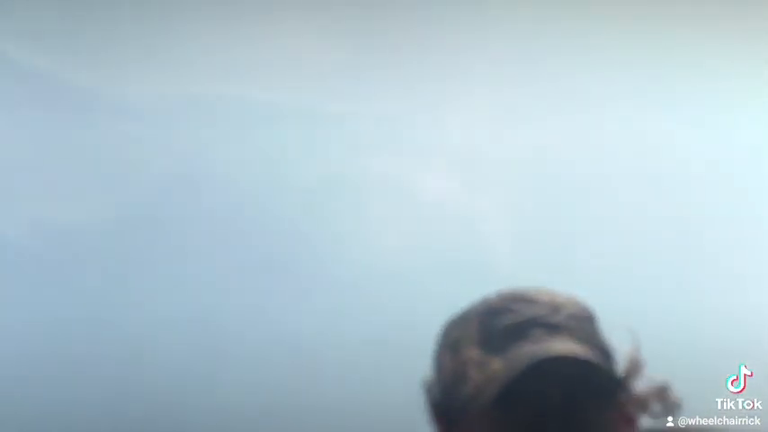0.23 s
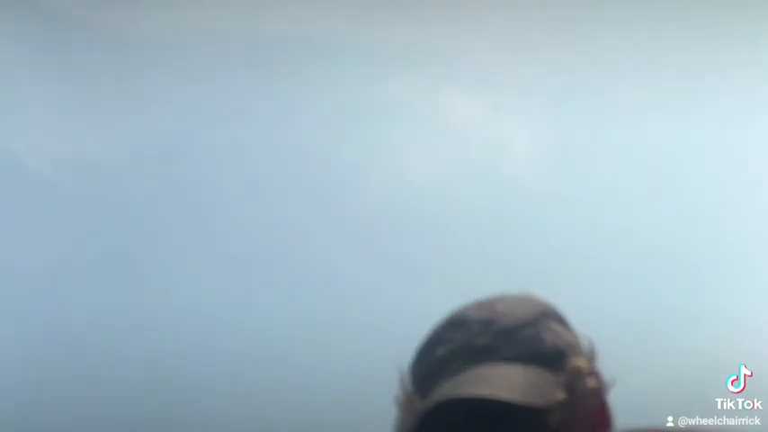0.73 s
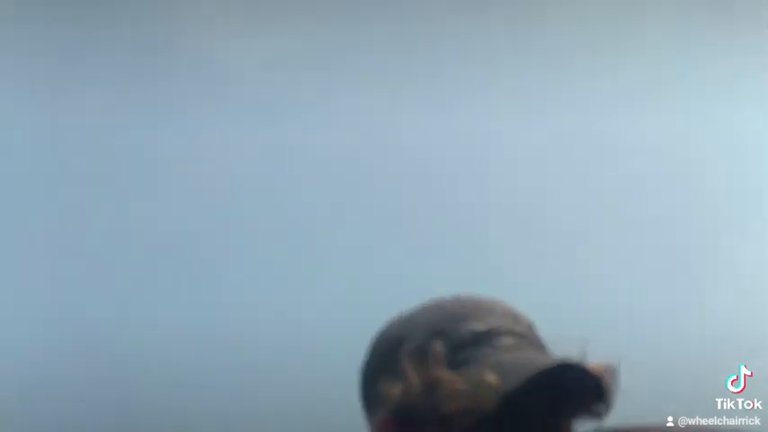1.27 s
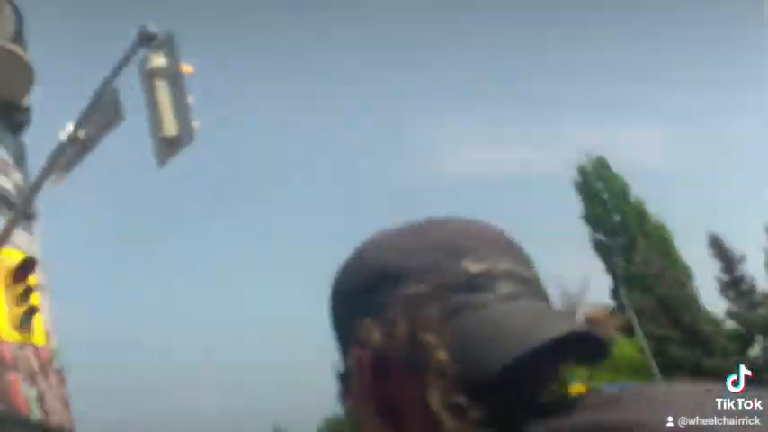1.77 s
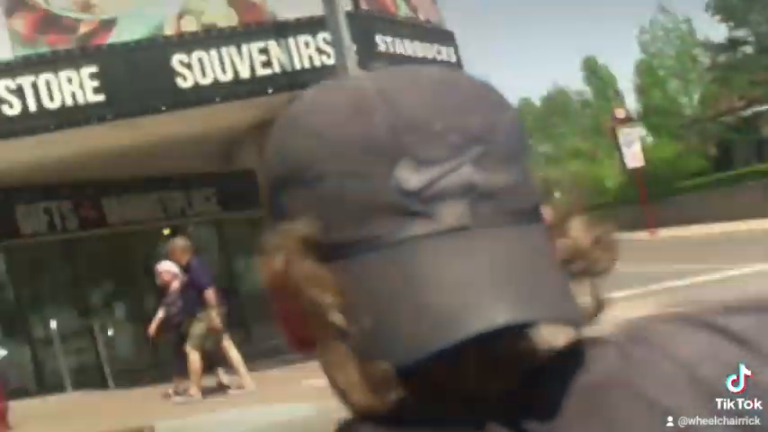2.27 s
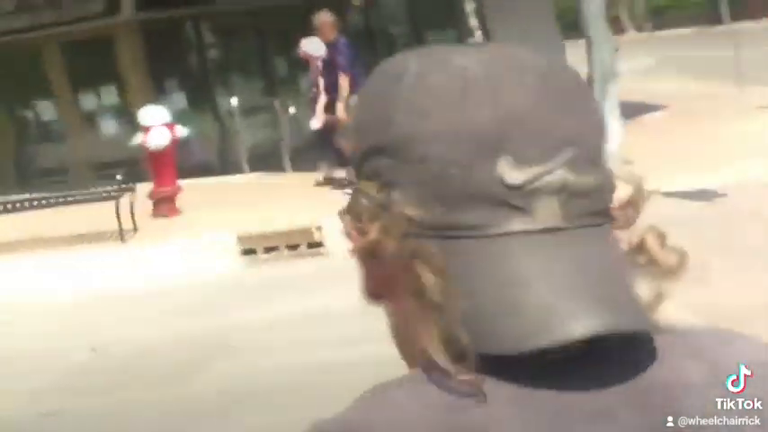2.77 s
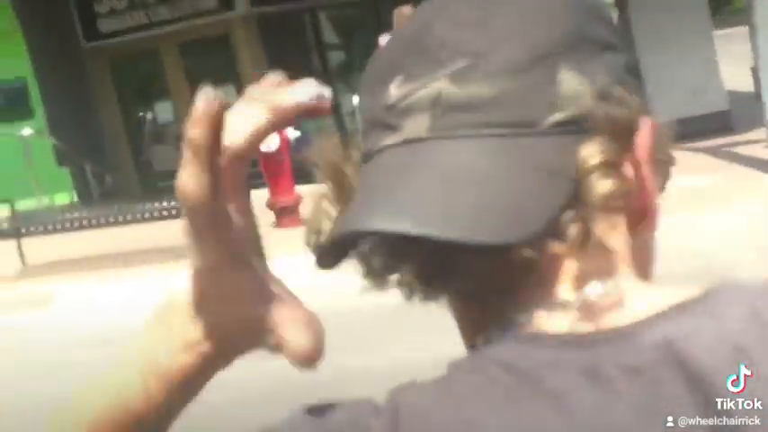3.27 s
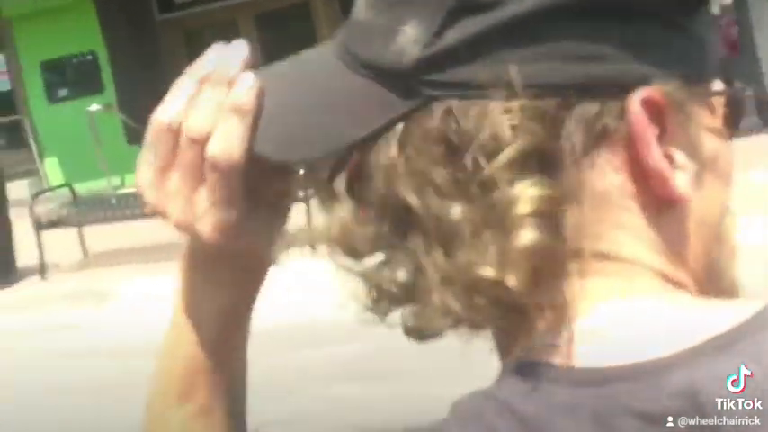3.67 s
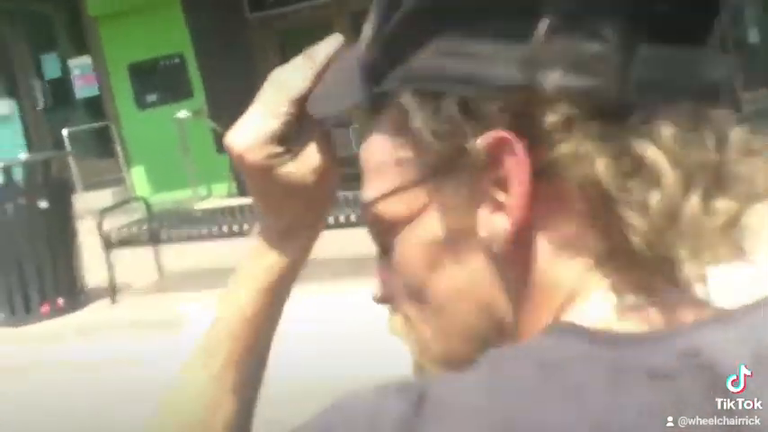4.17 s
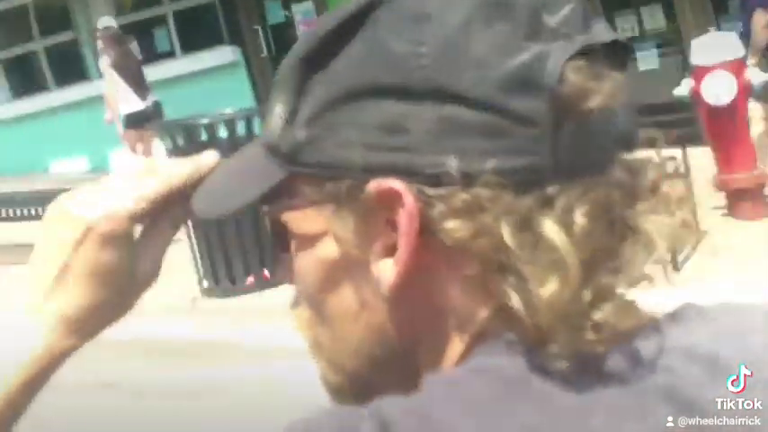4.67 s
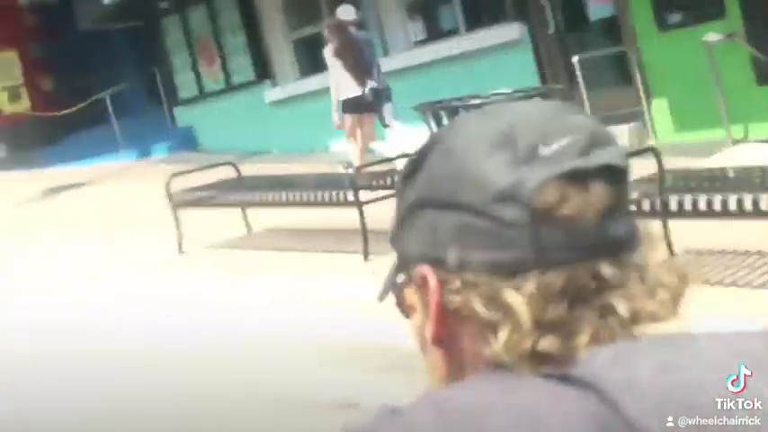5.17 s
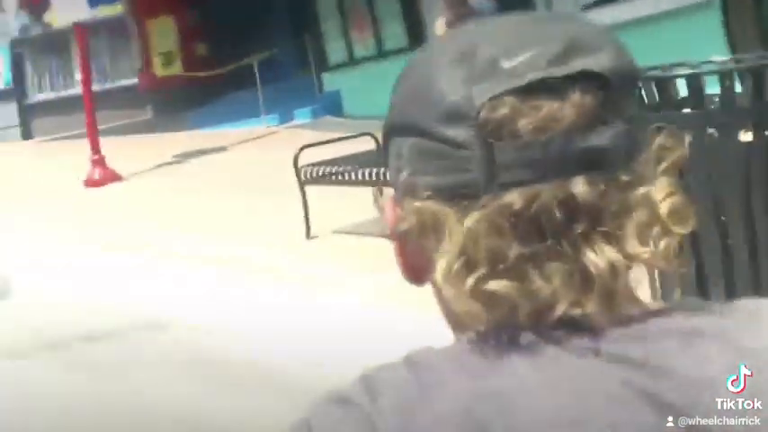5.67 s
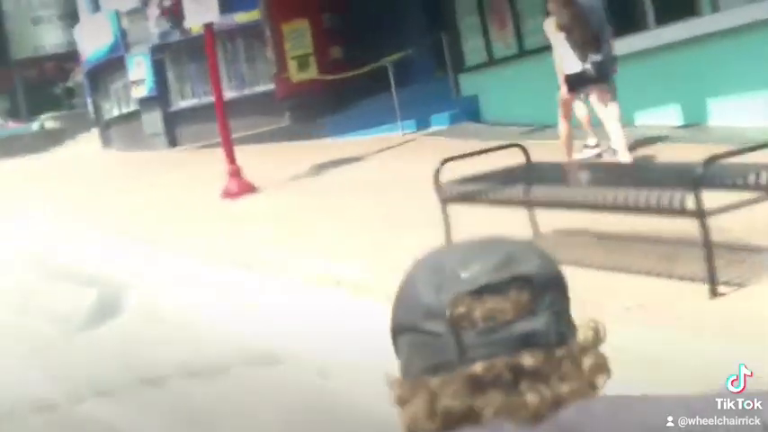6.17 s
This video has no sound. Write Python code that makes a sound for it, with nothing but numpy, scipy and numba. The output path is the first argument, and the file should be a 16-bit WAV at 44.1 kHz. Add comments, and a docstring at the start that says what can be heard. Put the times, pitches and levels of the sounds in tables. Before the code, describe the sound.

Heavy wind buffets the microphone in deep, ragged gusts while a wheelchair rolls over pavement with a gritty hiss that grows louder near the end.

```python
"""A wheelchair rolls downhill on pavement, and a phone rides along in the rumbling wind.
From the start, air flutters and whistles across the microphone's opening, and tyre grit makes the frame
and rims ring; that rolling noise drops at strong gusts and creeps back. A thin squeak comes at 0.6 s,
a bird chirps at 1.8 s, and another squeak follows at 2.4 s. From 2.7 s the wind slaps the microphone,
and near 3 s something small rattles. The slaps end at 5.4 s, and the rolling grows to its loudest."""
import sys
import numpy as np
from scipy import signal
from scipy.fft import rfft, irfft
from scipy.io import wavfile
from scipy.ndimage import uniform_filter1d
from numba import njit

SR = 44100
rng = np.random.default_rng(int(sys.argv[2]) if len(sys.argv) > 2 else 0)


def digitize_waveform(pressure):
    """Quantize a signal to 16-bit integers and store it at the path in sys.argv[1].

    Rows of a 2-D input are taken as channels; values are limited to [-1, 1].
    """
    field = np.atleast_2d(pressure).T
    bounded = np.clip(field, -1, 1)
    quanta = np.round(bounded * 32767).astype(np.int16)
    wavfile.write(sys.argv[1], SR, quanta)


N = 282681
T = np.arange(N) / SR


# Wind rumble: t/s, level/dB, upper bass compared with that level/dB, raggedness/0-1, relative speed
WIND = [(0, -21.5, -5.5, 0.785, .8), (.49, -17, -4, .8, .9), (.75, -18, -5, .8, 1.),
        (.85, -15.5, -17, .8, 1.), (1.17, -14, -14.5, .8, 1.), (1.25, -24, -7, .8, 1.),
        (1.9, -16.5, -4.5, .8, .9), (2.2, -12, -16.5, .8, .9), (2.7, -14.5, -14.5, .6, 1.25),
        (3.2, -16.5, -21, .7, 1.4), (3.55, -14, -24, .9, 1.1), (3.8, -13, -21, .9, .95),
        (4.1, -14, -14.5, .9, .9), (4.35, -14, -17, .9, .9), (4.6, -17.5, -6.5, .9, .9),
        (4.9, -13.5, -28.5, .6, .75), (5.1, -14.5, -15, .8, .8), (5.5, -13.5, -25, .7, .8),
        (5.67, -16.5, -10.5, .3, 1.1), (6.41, -20.5, -4.5, .3, .9)]
# Short dips in the wind rumble's loudness: middle t/s, depth/dB, half length/s
RUMBLE_DIPS = [(0.312, 8.5, 0.029), (0.59, 4.5, 0.085), (0.957, 5, 0.053), (1.263, 2, 0.15),
               (1.77, 5.5, 0.03), (1.947, 12, 0.041), (2.126, 19, 0.015), (2.276, 9.5, 0.034),
               (2.351, 6.5, 0.026), (2.5, 4.5, 0.13), (3.136, 13, 0.0096), (3.299, 16, 0.017),
               (3.37, 6.5, 0.024), (3.511, 17, 0.019), (3.613, 15, 0.0071), (3.717, 14, 0.0075),
               (3.888, 14, 0.014), (3.749, 16, 0.023), (4.112, 5, 0.0174), (4.185, 2.5, 0.011),
               (4.25, 8, 0.03), (4.456, 14, 0.023), (4.68, 4, 0.018), (5.05, 4, 0.0067), (5.297, 14, 0.013),
               (5.565, 10, 0.045)]

def wind_rumble():
    """Big swirls of air drift past at an uneven speed, so slow swings mix with steep edges."""
    level_db, upper_db, raggedness, speed = curves(WIND)
    level_db -= sum(depth * np.exp(-((T - middle) / half) ** 2) for middle, depth, half in RUMBLE_DIPS)
    gusts = raggedness * wobble(35)
    swirls = sum(gain(db) * unit(band(noise(), hz, .75))
                 for hz, db in [(11, .5), (25, 14), (52, 2.5), (92, -8)])
    travelled = np.cumsum(speed * gain(3.5 * gusts))
    deep = np.interp(travelled / travelled[-1] * (N - 1), np.arange(N), low_pass(swirls, 146.7))
    deep = np.tanh(.75 * even_out(deep, .14))  # the microphone's thin skin stiffens on big swings
    flicker_db = 4.7 * gusts + 5.6 * raggedness * wobble(70) + 3.2 * wobble(7.4)
    upper = gain(flicker_db) * low_pass(band(noise(), 151, 1), 370)
    return gain(level_db) * (unit(deep) + gain(upper_db) * even_out(unit(upper), .15))


# Slaps of air on the microphone: t/s, size of the jump/dB, edge time/ms
AIR_SLAPS = [(2.73, -1.5, 0.76), (3.229, -6, 1.0), (3.241, 0.5, 0.67), (3.251, -2.5, 0.43),
             (3.262, -2.5, 1.0), (3.274, -5.5, 0.91), (3.452, 5.5, 1), (3.471, 1, 0.64), (3.565, -11, 0.39),
             (3.573, 0, 0.59), (3.601, -11.5, 0.38), (3.697, 0.5, 0.45), (3.732, -8.5, 0.33),
             (3.738, -4, 0.35), (3.757, -13, 0.29), (3.769, -13, 0.57), (3.814, -18, 0.18),
             (3.85, -3, 0.54), (3.877, 1.5, 0.47), (3.936, -6, 0.29), (3.946, -7.5, 0.38),
             (3.961, -22, 0.34), (3.976, 0.5, 0.4), (4.045, -3, 0.49), (4.093, -11.5, 0.3),
             (4.167, -9.5, 0.24), (4.21, -4, 0.29), (4.24, -7, 0.62), (4.287, -12, .4), (4.312, -0.5, 0.53),
             (4.351, -3.5, 0.21), (4.398, -9.5, 0.11), (4.415, -0.5, 1), (4.522, -3.5, 0.82),
             (4.588, -2, 0.59), (4.624, 3.5, 0.76), (4.789, -5, 0.95), (4.971, -1.5, 0.68),
             (5.003, -2, 0.8), (5.138, -9.5, 0.9), (5.227, -6, 1), (5.256, -3, 0.52), (5.388, -7.5, 0.79)]

def wind_slaps():
    """Air pressure builds, flips through zero in about a millisecond and settles back."""
    build_s, settle_s = .0073, .0043
    out, t = np.zeros(N), np.arange(-2000, 2000) / SR
    swell = np.exp(-np.abs(t) / np.where(t < 0, build_s, settle_s)) / 2
    for middle, db, edge_ms in AIR_SLAPS:
        add(out, middle + t[0], -gain(db) * swell * np.tanh(t * 1000 / edge_ms))
    return out


# Puffs of air: t/s, length/s, level/dB, whistle f/Hz, flutter compared with the whistle/dB
AIR_PUFFS = [(0, 0.037, -14, 1036, 7), (0.037, 0.089, -19.5, 1000, -0.5), (0.133, 0.069, -19.5, 910, 2),
             (0.226, 0.035, -23, 717, 9), (0.303, 0.022, -22, 780, -6), (0.353, 0.033, -21, 490, -1.5),
             (0.411, 0.037, -22, 610, -1.5), (0.458, 0.021, -14, 746, -3), (0.485, 0.087, -21, 615, 4.5),
             (0.59, 0.057, -24.5, 543, 5.5), (0.655, 0.016, -20, 570, 11), (0.691, 0.039, -13.5, 699, -1.5),
             (0.743, 0.028, -17, 735, 0.5), (0.771, 0.042, -18.5, 780, 9), (0.819, 0.035, -27, 900, 2),
             (0.87, 0.06, -29, 1000, 6.5), (0.938, 0.053, -36, 460, 6), (0.995, 0.008, -21.5, 600, 1),
             (1.016, 0.052, -22, 590, 9.5), (1.08, 0.062, -23.5, 593, 19), (1.164, 0.0082, -23, 506, 3),
             (1.189, 0.028, -16, 735, 1), (1.252, 0.016, -21, 453, -4.5), (1.311, 0.015, -19.5, 725, -7),
             (1.341, 0.012, -21, 576, 3), (1.388, 0.18, -33, 448, -3), (1.59, 0.002, -15, 362, -2.5),
             (1.633, .26, -38, 514, -7), (1.716, 0.037, -26, 417, -2), (1.892, 0.0028, -22.5, 520, 5.5),
             (2.021, 0.019, -29, 428, -3), (2.077, 0.011, -27.5, 423, 18), (2.142, 0.038, -29, 354, -6),
             (2.209, 0.0082, -25, 538, 3), (3.205, 0.059, -34.5, 366, -3), (3.418, 0.061, -39.5, 390, 4),
             (3.554, 0.026, -38.5, 326, 5), (3.686, 0.0075, -28, 420, -8), (3.735, 0.032, -38, 425, 10.5),
             (3.758, 0.0033, -21.5, 415, 6), (3.762, 0.0074, -19.5, 425, -2.5),
             (3.869, 0.013, -34, 365, -17), (3.929, 0.056, -31, 381, 0), (4.165, 0.0042, -28.5, 354, 11),
             (4.194, 0.037, -37, 373, -3), (4.268, 0.05, -39, 353, -7), (4.347, 0.014, -30.5, 350, 1.5),
             (4.4, 0.006, -35, 390, 3), (4.581, 0.011, -33, 320, -3), (4.623, 0.019, -48, 324, -10),
             (5.136, 0.02, -33, 340, -6), (5.217, 0.015, -37, 365, 1), (5.26, 0.016, -42, 327, -1)]

def wind_whistle():
    """Puffs cross the microphone's opening: each rises fast, holds and fades while its pitch sags."""
    rise_db_per_s, fall_db_per_s, sag_hz_per_s, still_db = 3028, 1501, 1000, -50.5
    level_db, pitch_hz, flutter_db = np.full(N, still_db), np.zeros(N), np.zeros(N)
    for start, length, db, hz, puff_flutter_db in AIR_PUFFS:
        before, after = np.maximum(start - T, 0), np.maximum(T - start - length, 0)
        level_db = np.maximum(level_db, db - rise_db_per_s * before - fall_db_per_s * after)
        begun = before < .005
        pitch_hz = np.where(begun, hz - sag_hz_per_s * np.clip(T - start, 0, length), pitch_hz)
        flutter_db[begun] = puff_flutter_db
    torn = gain(.49 * wobble(43) + 2.1 * wobble(150))  # breaks the sound into scraps
    pitch_hz *= 1 + .03 * wobble(40)
    whistle = unit(band(band(noise(), pitch_hz, .13), pitch_hz, .29))
    flutter = unit(band(band(noise(), 458, .81), 603, 1.08))
    flow = torn * low_pass(whistle + gain(flutter_db) * flutter, 1540)
    return gain(level_db) * even_out(unit(flow), .05)


# Sudden small swirls of air: t/s, level/dB, f/Hz
SMALL_SWIRLS = [(0.23, -11, 560), (0.317, -16, 770), (0.38, -5, 477), (0.411, -13, 420), (0.463, -7, 750),
                (0.533, -6.5, 467), (0.662, 2, 475), (0.696, -19, 720), (0.746, -11, 696),
                (0.901, -32, 371), (1.001, -14, 610), (1.02, -13, 664), (1.078, -10, 358),
                (1.132, -20, 620), (1.188, -14, 750), (1.257, -4, 476), (1.317, -9, 730), (1.341, -10, 640),
                (1.494, -9.5, 306), (1.592, -11.5, 377), (1.737, -5.5, 286), (1.892, -3.5, 476),
                (2.03, -12, 445), (2.08, -12, 398), (2.165, -19, 316), (2.206, -13, 676)]

def wind_snaps():
    """Single swirls snap at the microphone's opening, each a tiny note that slides in pitch."""
    out, t = np.zeros(N), np.arange(int(.06 * SR)) / SR
    rise_s, fade_s = .0005, .005
    shape = (1 - np.exp(-t / rise_s)) ** 2 * np.exp(-(t / fade_s) ** 1.5)
    for start, db, hz in SMALL_SWIRLS:
        side, slide = noise(2)
        cycles = hz * t * (1 + .02 * slide * hz * t)
        add(out, start, np.sign(side) * gain(db) * shape * np.sin(2 * np.pi * cycles))
    return out


# Raspy bursts of air: t/s, length/s, level/dB, centre f/Hz
AIR_RASPS = [(.0, 0.033, -29.5, 1470), (0.13, 0.046, -41, 1500), (0.767, 0.057, -33.5, 1350),
             (0.825, 0.05, -36.5, 1160), (0.875, 0.055, -37, 1210), (1.003, 0.18, -41, 1200)]

def wind_rasp():
    """The flow over the opening turns rough, in torn bursts pitched above the flutter."""
    out = np.zeros(N)
    for start, length, db, hz in AIR_RASPS:
        n = int((length + .014) * SR)
        burst = unit(band(band(noise(n), hz, .65), hz, .66))
        add(out, start, gain(db) * signal.windows.tukey(n, .4) * burst)
    return out * gain(2.8 * wobble(120))


# Rolling noise between drops: t/s, level/dB, then boosts for: low rings/dB, high rings/dB,
# hiss under 1.2 kHz/dB, hiss from 2.2 to 3.5 kHz/dB, hiss over 8 kHz/dB
ROLLING = [(0, -43, -6, -7, 0, -4, 8), (.25, -41, 4.5, 3, 3, 2, 7), (.5, -37, 5.5, 3.5, 0, -1, 4.5),
           (.8, -33.5, 3, -9, -15, 1, 1.5), (1.2, -43.5, 5.5, -4, -18, 2.5, 2),
           (1.36, -38.5, 7.5, -7, 2.5, 1.5, 2.5), (1.57, -32.5, 7, 0, 1.5, 4.5, 3.5),
           (1.9, -33, 9.5, -5, 3.5, 2.5, 0), (2.2, -30.5, 4.5, -13, 0, 0, 1),
           (2.55, -29.5, 3, 2.5, 0.5, -1, -3.5), (2.9, -34.5, -1.5, 2, -2, -1, -0.5),
           (3.2, -32.5, 5.5, -0.5, -0.5, 2, -0.5), (3.45, -27.5, -3.5, 2, -1, -3, -0.5),
           (3.9, -43.5, -4.5, -14, 0.5, 4, -2), (4.35, -42.5, -4, 5, 3, -1, 1),
           (4.73, -34.5, 0, -1, 0, 1, 0.5), (4.9, -32, -3, 4, 0, -4, -1.5), (5.25, -35, 0, 4.5, 0, 1.5, -1),
           (5.37, -30.5, -7, 1.5, 2, -2, -2), (5.55, -31, 1, 1.5, -0.5, 0.5, 1.5),
           (5.85, -26, -3, 4, 0.5, -2, -5.5), (6.13, -26, 2, 0.5, 0.5, 2.5, 0),
           (6.41, -27, -4, 3.5, 0, -3, -3)]
# Tone of the grit, from low to high: f/Hz, level/dB
GRIT_TONE = [(200, -9), (350, 8), (700, 5), (1100, -0.5), (1400, 4), (1700, -1), (2000, 5), (2300, -4),
             (2800, -0.5), (3300, -5.5), (6200, -11), (6850, -11), (7500, -19.5), (8500, -26.5),
             (9500, -23), (10600, -24.5), (12000, -28.5), (15800, -40)]
# Notes at which the frame and rims ring: f/Hz, rough width/Hz, boost/dB
FRAME_RINGS = [(1340, 50, 7), (1450, 35, 6), (1575, 35, 2), (1880, 40, 0), (1972, 36, 5.5), (2072, 35, 2),
               (2150, 40, 1), (2450, 36, 7), (2872, 30, 6.5), (3160, 40, 1), (3425, 60, 1), (3540, 50, 0),
               (4074, 24, 7), (4362, 36, 5), (4640, 24, 7), (5105, 70, 0), (5440, 70, 1), (5873, 45, 1),
               (6093, 50, 3), (6345, 58, 1), (6530, 60, 2), (9500, 160, 1), (9950, 120, 0), (10420, 140, 2)]
# Drops in the rolling noise at strong gusts: t/s, depth/dB
GUST_DROPS = [(0.531, 10.5), (.728, 12), (.812, 18), (1.215, 5), (1.894, 11), (2.086, 9.5), (2.177, 7.5),
              (2.211, 10.5), (2.24, 8), (2.672, 8), (2.819, 4.5), (3.248, 14), (3.464, 16.5), (3.544, 8),
              (3.699, 5), (4.409, 7), (4.913, 2.5), (4.964, 10), (5.072, 5.5), (5.157, 6.5), (5.388, 3),
              (5.434, 15.5), (6.195, 1)]

def rolling_wheels():
    """Grit under the tyres makes a patchy hiss and shakes the frame and rims into ringing."""
    level_db, low_ring_db, high_ring_db, low_db, mid_db, top_db = curves(ROLLING)
    grit = noise() * gain(3.7 * np.minimum(rng.exponential(size=N), 6))  # a few grains hit harder
    grit *= gain(.15 * wobble(28.11))
    tone_hz, tone_db = np.transpose(GRIT_TONE)
    freqs = np.maximum(np.arange(N // 2 + 1) * SR / N, 1)
    spectrum = rfft(grit) * gain(np.interp(np.log(freqs), np.log(tone_hz), tone_db, left=-99))
    shaking = np.roll(irfft(spectrum, N), N // 2)  # shifted in time so rings and hiss do not cancel
    rings = hiss = 0
    for hz, width_hz, db in FRAME_RINGS:  # each part wavers in pitch and strength
        pitch_hz = hz * (1 + .002 * wobble(14))
        ring = band(band(shaking, pitch_hz, 1.14 * width_hz / hz), pitch_hz, 5 * width_hz / hz)
        boost_db = low_ring_db if hz < 2200 else high_ring_db
        rings += gain(db + boost_db + 1.5 * wobble(24)) * ring
    edges_hz = [0, 600, 1200, 1650, 2200, 2800, 3500, 5000, 8000, SR]
    boosts_db = [low_db, low_db, 0, 0, mid_db, mid_db, 0, 0, top_db]
    for low, high, boost_db in zip(edges_hz, edges_hz[1:], boosts_db):
        hiss_slice = irfft(spectrum * ((freqs > low) & (freqs <= high)), N)
        hiss += gain(1.5 * wobble(18) + boost_db) * hiss_slice  # each slice swells on its own
    drop_s, creep_back_s = .0012, .089
    for start, depth_db in GUST_DROPS:
        since = np.maximum(T - start + drop_s / 2, 0)
        level_db -= depth_db * np.minimum(since / drop_s, 1) * np.exp(-since / creep_back_s)
    return gain(level_db) * unit(hiss + rings)


# Hits of the rattle: t/s, peak level/dB, f/Hz
RATTLE_HITS = [(2.9306, -17.5, 5030), (2.93, -43, 10800), (2.94, -19, 6460), (2.9543, -20, 5730),
               (2.966, -29, 5600), (2.977, -22, 5900), (2.988, -26, 5900), (2.9994, -35, 5690)]

def rattle():
    """Something small rattles in a quick run of bright clicks."""
    out, t = np.zeros(N), np.arange(int(.012 * SR)) / SR
    shape = (1 - np.exp(-t / .0002)) * np.exp(-t / .0014)
    for start, db, hz in RATTLE_HITS:
        click = band(band(noise(len(t)) * shape, hz, .28), hz, .28)
        add(out, start, gain(db) * click / np.abs(click).max())
    return out


# The bird's notes: t/s, level/dB, start f/Hz, end f/Hz, length/ms
BIRD_NOTES = [(1.758, -45, 4950, 6550, 32), (1.790, -42, 3900, 5530, 32), (1.862, -40.5, 3450, 4800, 19)]
# Each note and its two echoes: delay/s, level change/dB
BIRD_ECHOES = [(0, -1), (.0125, 0), (.027, -11)]

def bird():
    """A bird sings hoarse rising notes, and house fronts throw them back."""
    out = np.zeros(N)
    hoarse = gain(4.5 * wobble(300))
    for start, db, from_hz, to_hz, ms in BIRD_NOTES:
        hz = np.linspace(from_hz, to_hz, int(ms * SR / 1000))
        note = np.sin(2 * np.pi * np.cumsum(hz) / SR) * hoarse[int(start * SR):][:len(hz)]
        note = signal.windows.tukey(len(hz), .6) * unit(note)
        for delay, echo_db in BIRD_ECHOES:
            add(out, start + delay, gain(db + echo_db) * note)
    return out


# Faint squeaks: t/s, level/dB, f/Hz, length/s
THIN_SQUEAKS = [(0.557, -62, 9400, .05), (2.37, -57, 11700, .04)]

def squeaks():
    """Thin, very high squeaks fade in and out."""
    out = np.zeros(N)
    for start, db, hz, length in THIN_SQUEAKS:
        n = int(length * SR)
        squeak = unit(band(band(noise(n), hz, .01), hz, .02))
        add(out, start, gain(db) * np.hanning(n) * squeak)
    return out


# The clearest high ticks: t/s, peak level/dB
CLEAR_TICKS = [(0.0437, -30), (0.7406, -42), (0.7725, -41), (0.805, -38), (0.9217, -44), (1.1138, -46),
               (1.1891, -41), (1.21, -42), (2.2063, -48), (2.2232, -36), (2.6718, -46), (2.8065, -42),
               (2.832, -39), (3.002, -42), (3.2609, -42), (3.5412, -45), (3.5792, -32), (3.5991, -37),
               (3.682, -48), (3.696, -47), (3.8121, -40), (3.8439, -29), (3.874, -33), (3.9269, -42),
               (3.9414, -48), (4.0256, -45), (4.1329, -42), (4.1425, -44), (4.1968, -38), (4.2092, -37),
               (4.2287, -38), (4.3549, -43), (4.4023, -45), (4.4144, -40), (4.6338, -44), (4.7281, -46),
               (4.997, -41), (5.008, -41), (5.1032, -36), (5.253, -43), (5.4285, -45), (5.4768, -38),
               (5.666, -38)]

def ticks(sound):
    """Faint ticks sit on the peaks of the sound's big swings; clearer ones come at set times."""
    threshold, faint_db, fade_s = .21, -43, .0006
    peaks = signal.find_peaks(np.abs(low_pass(sound, 1200)), height=threshold, distance=90)[0]
    out, hiss = np.zeros(N), noise()
    out[peaks] = gain(faint_db) * np.abs(hiss[peaks]) * sound[peaks] / threshold
    t = np.arange(int(6 * fade_s * SR)) / SR
    for start, db in CLEAR_TICKS:
        tick = hiss[int(start * SR):][:len(t)] * np.exp(-t / fade_s)
        add(out, start, gain(db) * tick / np.abs(tick).max())
    return out


@njit
def limiter(x, ceiling, recover_s):
    """Turn down at once to hold a peak at the ceiling, then creep back up."""
    out, peak = np.empty(len(x)), ceiling
    keep = np.exp(-1 / (recover_s * SR))
    for i in range(len(x)):
        peak = max(abs(x[i]), ceiling + (peak - ceiling) * keep)
        out[i] = x[i] * ceiling / peak
    return out


def noise(n=N):
    """Plain white hiss."""
    return rng.standard_normal(n)


def gain(db):
    """Turn decibels into a multiplier."""
    return 10 ** (np.asarray(db) / 20)


def unit(x):
    """Scale to an average strength (rms) of 1."""
    return x / np.sqrt(np.mean(x ** 2))


def even_out(x, seconds):
    """Remove level changes slower than the given time."""
    return x / np.sqrt(uniform_filter1d(x ** 2, int(seconds * SR)) + 1e-3)


def curves(table):
    """Join each column's values with straight lines in time."""
    times, *columns = np.transpose(table)
    return [np.interp(T, times, column) for column in columns]


def wobble(per_second):
    """A smooth random curve of typical size 1."""
    hold = int(SR / per_second)
    steps = np.repeat(noise(N // hold + 1), hold)
    return unit(uniform_filter1d(uniform_filter1d(steps, hold), hold)[:N])


@njit
def band(x, hz, width):
    """Keep the sound near hz, which may move; width is a fraction of hz."""
    tuning = np.tan(np.pi * (hz + np.zeros(len(x))) / SR)
    out, mid, low = np.empty(len(x)), 0., 0.
    for i, step in enumerate(tuning):
        swing = (mid + step * (x[i] - low)) / (1 + step * (step + width))
        out[i] = width * swing
        mid, low = 2 * swing - mid, low + 2 * step * swing
    return out


def low_pass(x, hz):
    """Keep the sound below hz."""
    return signal.sosfilt(signal.butter(4, hz, fs=SR, output="sos"), x)


def add(out, start, sound):
    """Mix in a short sound at start seconds."""
    i = int(start * SR)
    out[i:i + len(sound)] += sound[:N - i]


def scene():
    """Wind, wheels and the small sounds, in one channel."""
    wind = wind_rumble() + wind_slaps() + wind_whistle() + wind_snaps() + wind_rasp()
    return (wind + rolling_wheels() + rattle() + bird() + squeaks())[None]


def record(dry):
    """The phone holds down wind peaks, loses the slowest swings, adds ticks and hiss, and cuts the top."""
    bottom_hz, top_hz, hiss_db = 6, 15800, -69
    sound = limiter(dry[0], ceiling=float(gain(-7.5)), recover_s=.012)
    sound = signal.sosfilt(signal.butter(1, bottom_hz, "high", fs=SR, output="sos"), sound)
    sound = sound + ticks(sound) + gain(hiss_db) * noise()
    return signal.sosfilt(signal.ellip(8, .2, 70, top_hz, fs=SR, output="sos"), sound)[None]


dry = scene()
out = record(dry)
digitize_waveform(out)
```